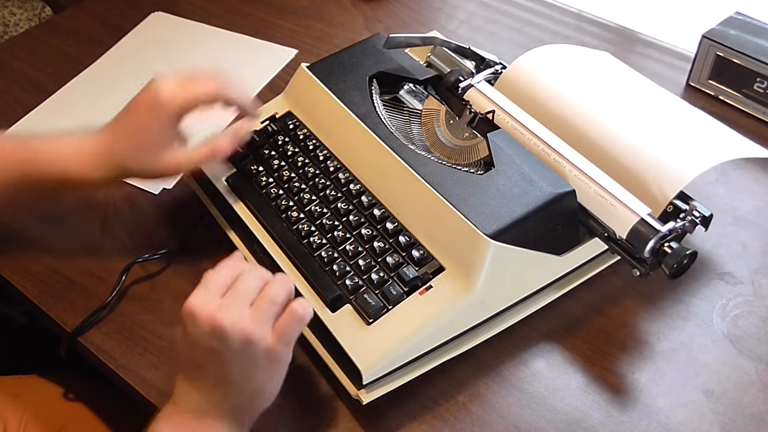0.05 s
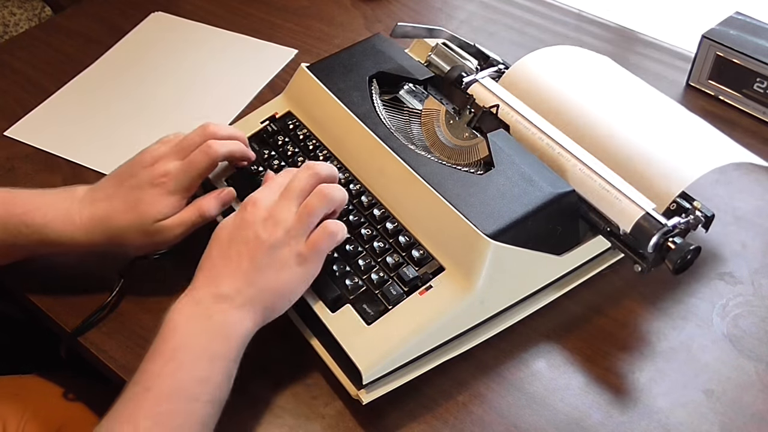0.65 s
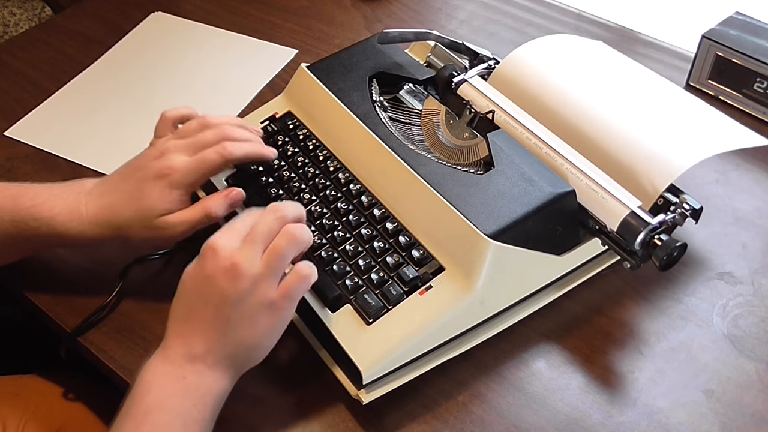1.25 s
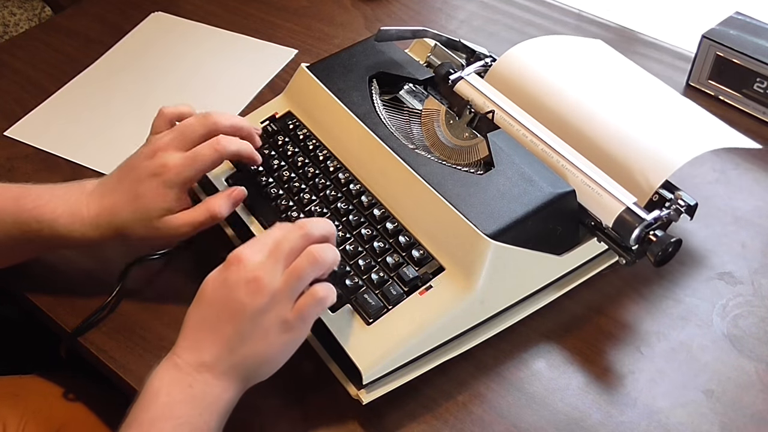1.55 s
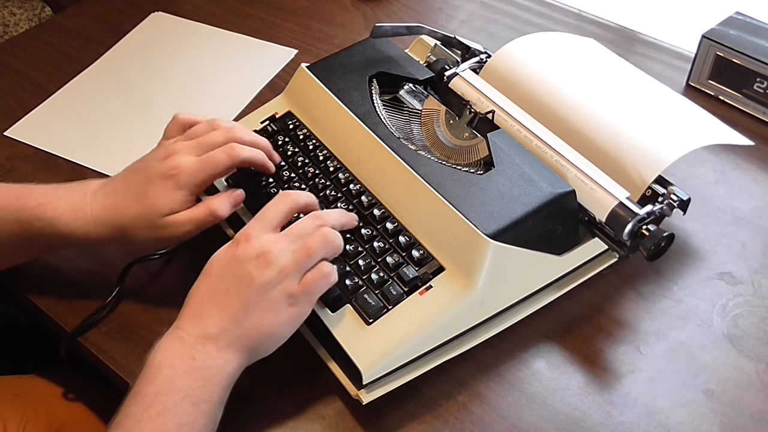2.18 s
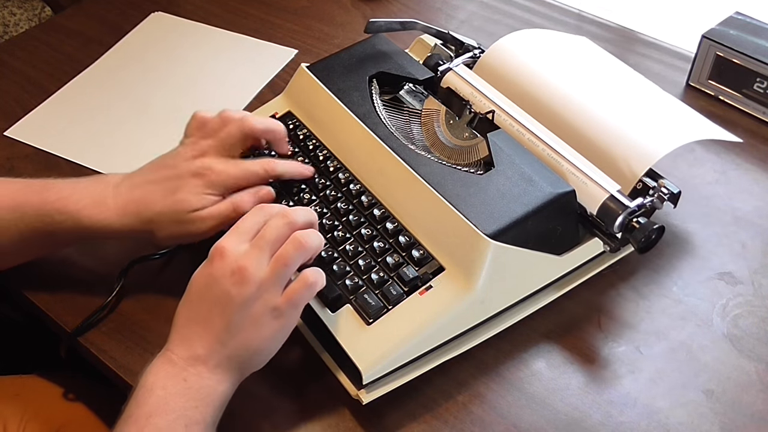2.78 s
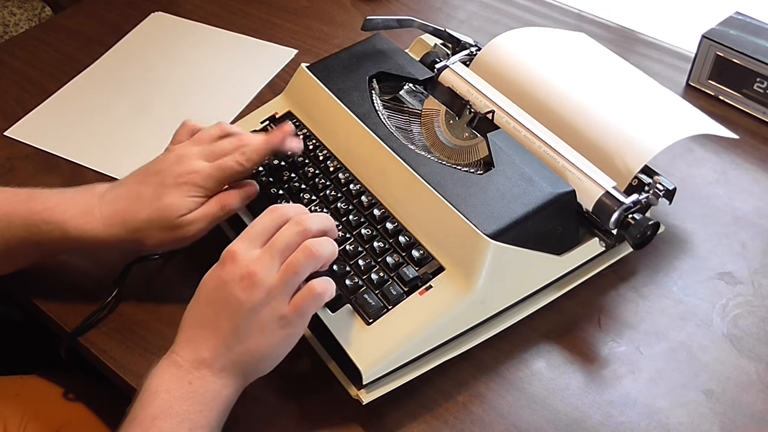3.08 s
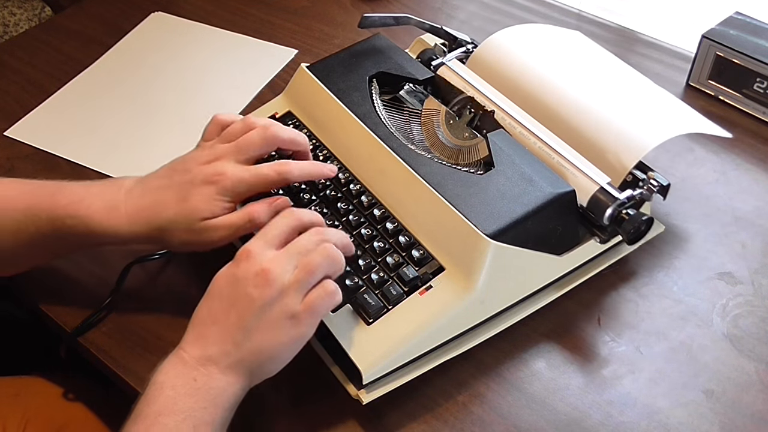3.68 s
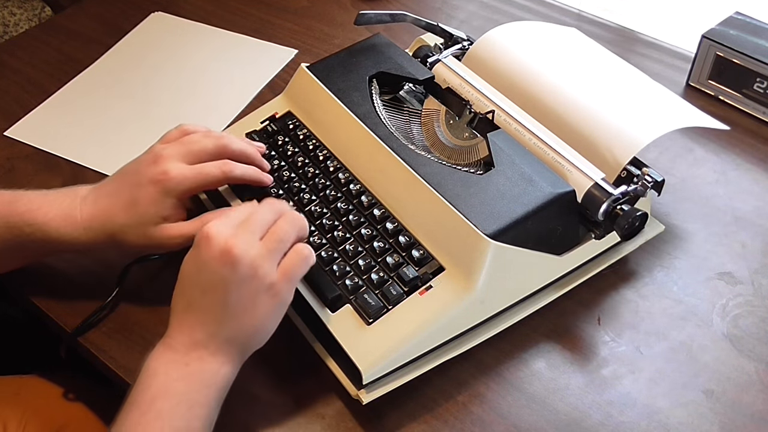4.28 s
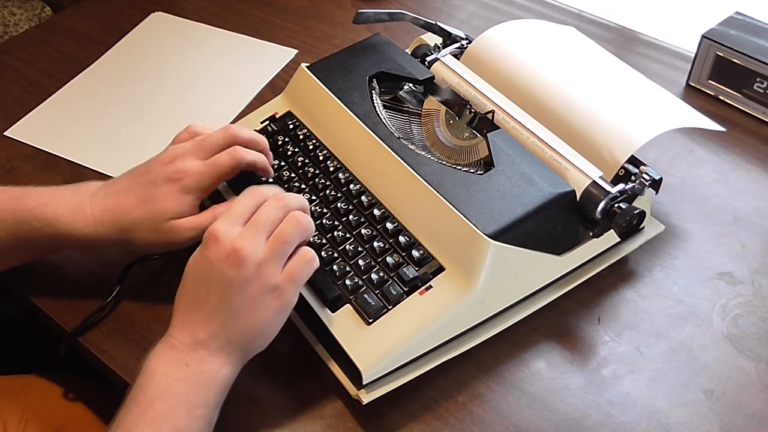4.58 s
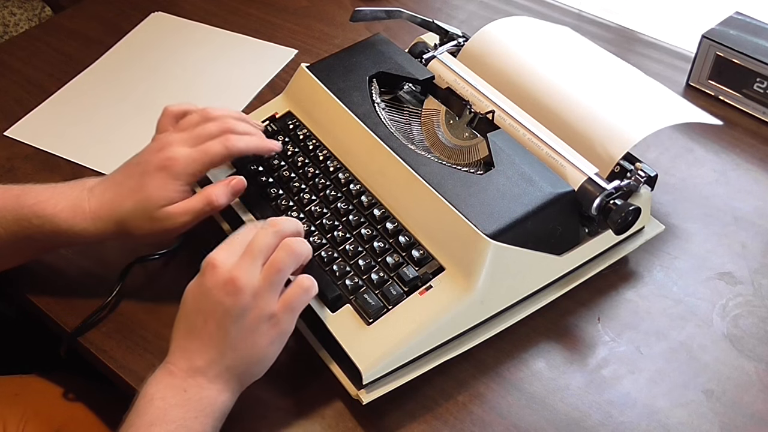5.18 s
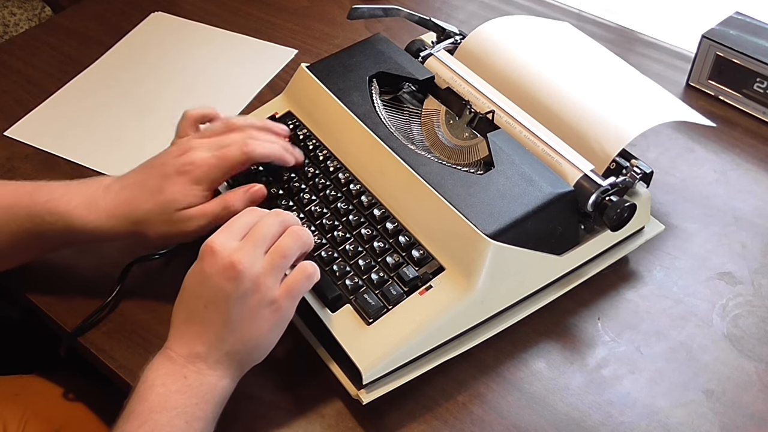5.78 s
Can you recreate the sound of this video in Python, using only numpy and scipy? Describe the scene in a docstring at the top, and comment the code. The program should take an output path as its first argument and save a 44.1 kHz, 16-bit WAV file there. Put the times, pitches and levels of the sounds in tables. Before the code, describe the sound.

An electric typewriter clacks in short, uneven runs of keystrokes, with a faint motor hum in the pauses.

```python
"""On a wooden desk an electric typewriter is typed on in quick runs, its motor idling in the pauses.
In each stroke a cam catches the power roll, a type bar swings up rattling, the escapement trips and
the slug slaps the platen; the type basket rings, the case thuds and the bar drops back onto its rest.
The shift clunks before the first letter, and the space bar goes down and up between words.
Each part is a resonator driven by impacts: the contacts set its rhythm, its damped modes its timbre."""
import sys
import numpy as np
from scipy import signal
from scipy.fft import rfft, irfft
from scipy.io import wavfile

SR = 44100
rng = np.random.default_rng(int(sys.argv[2]) if len(sys.argv) > 2 else 0)


def master(y):
    """Save y as 16-bit WAV."""
    cut = np.clip(np.atleast_2d(y).T, -1, 1)
    pcm = np.round(cut * 32767)  # scale
    wavfile.write(sys.argv[1], SR, pcm.astype(np.int16))


N = 257544
TIME = np.arange(N) / SR

# Loudness of the background hum and hiss, which sinks during the typing and recovers.
# Each row: time in seconds, level of hum and whirr in dB, level of hiss in dB.
BACKGROUND_LEVELS = [(0, -53, -60), (.55, -54, -65.5), (1.9, -60, -80), (3.45, -66.5, -78), (4.4, -61, -73),
                     (5.05, -62.5, -73), (5.84, -55, -67.5)]
# Hum lines of motor and belt. Each row: frequency in Hz, relative level in dB.
HUM_LINES = [(118.4, -70), (204.6, -69.5), (236.9, -69), (414.5, -76.5), (463, -79), (737.5, -73.5),
             (958, -80.5), (1265, -79), (1513, -87.5), (1787, -82)]
# Steady noises. Each row: frequency in Hz, relative spectral density in dB.
WHIRR_SPECTRUM = [(18, -48), (30, -19), (85, -9.5), (113, 0.5), (177, -8), (236, -7), (327, -10.5),
                  (463, -4.5), (572, -11.5), (707, -9), (1100, -15), (1650, -16), (3000, -36.5),
                  (3900, -68), (6600, -120)]
HISS_SPECTRUM = [(2000, 1), (3200, -6), (4900, 6), (6500, -2.5), (10000, -2), (16000, -6.5)]
FLAT_SPECTRUM = [(20, 0), (20000, 0)]
# Likeness of the two sides in noise and ringing. Each row: frequency in Hz, correlation from -1 to 1.
STEREO_CORRELATION = [(60, 0.31), (300, 0.74), (2500, 0.82), (5000, 0.74), (8000, 0.42), (10000, 0.15),
                      (11500, 0.39), (12500, 1), (16000, 0.54)]

# The dense ringing of each part. Each row: frequency in Hz, relative spectral density in dB.
CASE_SPECTRUM = [(30, -27.5), (55, -18), (100, -13), (170, -4), (240, -2.5), (330, -5.5), (450, 0.5),
                 (650, -4.5), (1000, -3), (1700, -3), (2200, -9), (2800, -22), (5000, -14), (16000, -57)]
KEY_STOP_SPECTRUM = [(40, -33.5), (110, -12.5), (220, -5), (330, -5.5), (450, 5.5), (620, -4.5), (900, 2.5),
                     (1250, -3), (1750, -4.5), (2700, -19.5), (5000, -24), (16000, -48.5)]  # a key or the space bar knocking hollowly on its stop
LEVER_SPECTRUM = [(60, -38.5), (400, -8), (1000, -12), (2700, -12.5), (3400, -11.5), (4300, 0.5),
                  (5200, -2), (6300, -3.5), (7500, -7.5), (10000, -8.5), (13000, -10.5), (16000, -14)]
BAR_SLOT_SPECTRUM = [(60, -34), (400, -10.5), (1000, -6.5), (2700, -14.5), (3600, -9), (4400, 0), (5500, 1),
                     (6500, -2), (7800, -10.5), (11000, -11.5), (16000, -17)]  # a type bar scraping up through its slot
ESCAPEMENT_SPECTRUM = [(60, -19.5), (400, -9), (1500, -11.5), (2800, -11.5), (4000, 0), (4800, -2),
                       (6000, -1.5), (10000, -4), (13500, -2.5), (16000, -10)]
BASKET_SPECTRUM = [(60, -34.5), (400, -16), (1000, -14), (2700, -14), (3400, -5), (4600, -1.5),
                   (7000, -1.5), (8700, -1), (9800, -4), (13000, -9.5), (16000, -18)]
# Ringing modes. Each row: frequency in Hz, relative level in dB, time to fall 60 dB in seconds.
CASE_FRAME_MODES = [(100, -8, 0.47), (202.5, -1.5, 0.49), (235.2, 3.5, 0.094), (305, -12.5, 0.062),
                    (452, 0.5, 0.43), (554.3, 2, 0.26), (728.7, 1, 0.25), (833, 2.5, .15),
                    (878.5, -1, 0.28), (1000, -5, 0.078), (1191, 4.5, .2), (1230, -3.5, 0.2),
                    (1260, -8, .18), (1496, 4.5, 0.15), (1780, -8.5, 0.2)]
BAR_SPRING_MODES = [(3950, -6.5, .17), (4530, -1, 0.17), (4850, -1.5, .2), (4930, -0.5, .2),
                    (5112, -5, .25), (5070, -2.5, .19), (6840, -5, .25), (6900, -4, .2), (7160, -1, 0.19),
                    (7470, -4, 0.22), (8050, -1, 0.28), (8530, -0.5, .2), (8869, -3.5, .18)]
# Heavily damped modes. Each row: frequency in Hz, relative level in dB, time to fall 60 dB in seconds,
# left-right difference in dB.
PAWL_PING_MODES = [(4780, -0.5, 0.029, 3), (5760, -0.5, 0.02, -0.5), (8870, -3.5, .025, -4.5),
                   (12200, 0.5, .025, 2)]
PLATEN_MODES = [(1900, -12.5, 0.0044, -4.5), (3130, -21.5, 0.046, 0.5), (3660, -15, 0.014, 2.5),
                (3880, -8.5, 0.015, -3.5), (4616, -2, 0.015, 2), (5090, 1, 0.0065, -2),
                (6200, 2, 0.0019, -1)]  # the slug on the platen
BRIGHT_EDGE_MODES = [(7600, -5.5, 0.002, -6), (8800, 6, 0.0036, -6.5), (9440, -0.5, 0.0036, -10.5),
                     (11650, 3.5, 0.00464, 1.5), (13200, -17, 0.0029, 8)]  # the treble of that blow

# Type strokes. Each row: time of the slap in seconds, force in dB above the usual, slap level in dB,
# its bright edge in relative dB, cam's lead in seconds, cam level in dB, thump level in dB.
TYPE_STROKES = [(0.7726, 3.5, 8.5, 20, .055, -19, -32), (0.993, 4, 6, 10, 0.049, -35.5, -37),
                (1.134, 2.5, 4, -2.5, 0.054, -37.5, -41), (1.2745, 0.5, 6.5, -2, 0.045, -33, -35),
                (1.6146, 3, 5, -4, .067, -36, -32.5), (1.7573, 0, 7.5, -3, 0.051, -35, -36),
                (1.9793, -.5, 9, -8.5, .052, -39, -41), (2.1582, -1, 7.5, -4.5, 0.061, -35.5, -68.5),
                (2.3003, -1.5, 3.5, -8, 0.047, -38.5, -65), (2.439, -3.5, 6.5, -6, 0.032, -38, -53.5),
                (2.5784, -4.5, 7, -0.5, 0.058, -39, -60), (2.9162, -2.5, 6.5, -1.5, 0.04, -35.5, -66),
                (3.1367, -2, 7, -1, 0.036, -38.5, -46), (3.2006, -4.5, 4.5, -1, 0.037, -45, -61),
                (3.6216, 0.5, 6.5, -2, .061, -38.5, -61.5), (3.7617, -.5, 5.5, -5, 0.032, -36, -51),
                (3.8986, -.5, 6, -.5, .045, -34.5, -51), (4.5517, 4, 9, -2.5, 0.047, -28.5, -34),
                (4.697, 0, 7, -0.5, .049, -44, -50), (5.196, 4, 9.7, -6, 0.053, -30, -34),
                (5.7319, 5, 8.5, -8, 0.049, -32, -33.5)]
# The space bar. Each row: press time in seconds, release time in seconds, force in dB above the usual.
SPACE_PRESSES = [(1.383, 1.469, 3), (2.669, 2.761, -6), (4.02, 4.124, -2), (5.309, 5.409, 1.5)]
# Keys touched without printing. Each row: time in seconds, click level in dB, knock level in dB.
IDLE_TOUCHES = [(.097, -74, -53), (0.481, -51, -63), (.896, -34.5, -36), (3.06, -44, -54.5),
                (4.819, -68, -60)]
# Contacts within one movement. Each row: delay in seconds, steel click and hollow knock in relative dB.
SHIFT_CONTACTS = [(0, -26.5, -22), (.018, -24, -25), (.05, -50, -27.5), (.116, -57, -42.5)]
SPACE_DOWN_CONTACTS = [(0, -40, -36), (.028, -59, -43.5)]
SPACE_UP_CONTACTS = [(-.016, -47.5, -58), (0, -43.5, -40), (.016, -45.5, -35), (.055, -62, -41.5)]
CAM_CATCH_CONTACTS = [(0, -2.5, -17.5), (.007, -2.5, -13.5)]  # the cam catches and its pawl bounces
CAM_KICK_CONTACTS = [(-.025, -8, -6)]  # the cam kicks the bar
BAR_REST_CONTACTS = [(.086, -59.5, -45)]  # the bar lands on its rest


def from_db(db):
    """Amplitude grows tenfold with every 20 dB."""
    return 10 ** (np.asarray(db) / 20)


def unit_energy(x):
    """Normalisation to a mean energy of 1 per channel."""
    return x / np.sqrt(np.sum(x ** 2) / len(np.atleast_2d(x)) + 1e-20)


def at_hz(points, hz):
    """Interpolation along a logarithmic frequency axis."""
    known_hz, values = np.transpose(points)
    return np.interp(np.log(hz), np.log(known_hz), values)


def add(out, s, sound):
    """Superposition: a sound joins the mix at s seconds."""
    start = max(round(s * SR), 0)
    part = sound[..., :max(N - start, 0)]
    out[..., start:start + part.shape[-1]] += part


def waver(rate_hz):
    """Random modulation: a line through normally distributed values."""
    return np.interp(TIME * rate_hz, np.arange(N // 100), rng.standard_normal(N // 100))


def noise(spectrum, size):
    """Random phases give coloured noise; the ratio of mid to side sets its stereo correlation."""
    hz = np.maximum(np.fft.rfftfreq(size, 1 / SR), 1)
    alike = np.clip(at_hz(STEREO_CORRELATION, hz), -1, 1)
    mid, side = np.exp(2j * np.pi * rng.random((2, len(hz))))
    channels = np.sqrt(1 + alike) * mid + np.sqrt(1 - alike) * side * [[1], [-1]]
    return unit_energy(irfft(channels * from_db(at_hz(spectrum, hz)), size))


def high_pass(x, hz):
    """High-pass filter: the sound is kept free of deep bass below hz."""
    return signal.sosfilt(signal.butter(2, hz, "high", fs=SR, output="sos"), x)


def colour(x, spectrum, size=4096):
    """A minimum-phase filter shapes the spectrum causally; white noise keeps its power."""
    hz = np.maximum(np.fft.rfftfreq(size, 1 / SR), 1)
    cepstrum = irfft(np.log(from_db(at_hz(spectrum, hz))))
    cepstrum[1:size // 2] *= 2
    cepstrum[size // 2 + 1:] = 0
    response = unit_energy(irfft(np.exp(rfft(cepstrum))))
    return signal.oaconvolve(x, response[None], axes=1)[:, :N]


def rattle(times, levels_db, fall_s, rise_s, per_s, spread_db):
    """Loose parts collide at random: bursts of uneven impulses swell, then lose 20 dB every fall_s."""
    out, t = np.zeros(N), TIME[:SR // 8]
    envelope = np.minimum((t + 1 / SR) / rise_s, 1) * from_db(-20 * np.maximum(t - rise_s, 0) / fall_s)
    for s, db in zip(times, levels_db):
        touching = (rng.random(len(t)) < per_s / SR) | (t == 0)
        sizes = from_db(spread_db * rng.uniform(-1, 1, len(t))) * rng.choice([-1, 1], len(t))
        add(out, s, from_db(db) * np.sqrt(SR // 100) * unit_energy(touching * sizes * envelope))
    return out


def excite(contacts, response):
    """Convolution: every contact starts the impulse response anew."""
    return signal.oaconvolve(contacts[None], response, axes=1)[:, :N]


def modal_ring(modes, width_rad):
    """Free vibration is a sum of decaying sines; each reaches the two sides at different phases."""
    hz, db, t60 = np.transpose(modes)[:, :, None]
    t = TIME[:SR // 2]
    apart = width_rad * rng.uniform(0.28, 1, hz.shape) * (-1) ** np.arange(len(hz))[:, None]
    decays = from_db(db - 60 * t / t60) * rng.choice([-1, 1], hz.shape)
    channels = [(decays * np.sin(2 * np.pi * hz * t + side * apart / 2)).sum(0) for side in (1, -1)]
    return unit_energy(np.array(channels))


def damped_blow(modes, detune):
    """An impact excites heavily damped modes, whose tuning and strength vary from blow to blow."""
    hz, db, t60, pan_db = np.transpose(modes)[:, :, None]
    t = TIME[:SR // 30]
    hz = hz * (1 + detune * rng.standard_normal(hz.shape))
    db = db + rng.normal(0, 1.8, db.shape)
    polarity = (-1) ** np.arange(len(hz))[:, None]
    rings = polarity * from_db(db - 60 * t / t60) * np.sin(2 * np.pi * hz * t)
    return unit_energy(np.array([(rings * from_db(side * pan_db / 2)).sum(0) for side in (1, -1)]))


def stored_energy(contacts, t60):
    """Damping: the energy that contacts put into a part leaks away exponentially."""
    retained = from_db(-120 / (t60 * SR))
    return signal.lfilter([1 - retained], [1, -retained], contacts ** 2 + 1e-18)


def resonate(contacts, spectrum, crack_t60, tail_t60, tail_db, direct_db, modal_share=0.22):
    """Two-stage decay: loose pieces chatter in a short crack, then in a tail shared with close modes."""
    tail, direct = from_db(tail_db), from_db(direct_db)
    tail_energy = (1 - modal_share) * tail ** 2 * stored_energy(contacts, tail_t60)
    energy = stored_energy(contacts, crack_t60) + tail_energy
    chatter = np.sqrt(N * energy) * noise(FLAT_SPECTRUM, size=N)
    t = TIME[:SR // 2]
    close_modes = unit_energy(noise(FLAT_SPECTRUM, size=len(t)) * from_db(-60 * t / tail_t60))
    ringing = chatter + np.sqrt(modal_share) * tail * excite(contacts, close_modes)
    return colour((direct * contacts + ringing) / np.sqrt(1 + tail ** 2 + direct ** 2), spectrum)


def motor():
    """Rotation gives line spectra, a hum and a thin whine, over hiss and the whirr of belt and roll."""
    s, *levels = np.transpose(BACKGROUND_LEVELS)
    hum_db, hiss_db = [np.interp(TIME, s, level) for level in levels]
    hum = np.zeros(N)
    for hz, db in HUM_LINES:
        amplitude = from_db(db + 2.1 * waver(rate_hz=7.9))
        hum += amplitude * np.sin(2 * np.pi * hz * TIME + 0.2 * waver(rate_hz=12))
    whirr = noise(WHIRR_SPECTRUM, size=N) * from_db(1.1 * waver(rate_hz=38))
    running = from_db(-4) * unit_energy(hum) + from_db(-2.5) * whirr
    whine_hz, whine_peak = 3063, np.sqrt(2) * from_db(-89.5)
    whine = whine_peak * np.sin(2 * np.pi * whine_hz * TIME + 0.3 * waver(rate_hz=12))
    hiss = from_db(hiss_db) * noise(HISS_SPECTRUM, size=N)
    return whine + np.sqrt(N) * (from_db(hum_db) * running + hiss)


def movements(times, levels_db, pattern):
    """A mechanism repeats the same run of contacts each time it moves."""
    return [(s + delay, db + click, db + knock)
            for s, db in zip(times, levels_db) for delay, click, knock in pattern]


def key_action(times, force_db, lead_s, cam_db):
    """Each catch or stop is an impact; returns their times, click levels and knock levels."""
    down_s, up_s, space_db = np.transpose(SPACE_PRESSES)
    cams = movements(times - lead_s, cam_db, CAM_CATCH_CONTACTS)
    kicks = movements(times, cam_db, CAM_KICK_CONTACTS)
    landings = movements(times, force_db, BAR_REST_CONTACTS)
    presses = movements(down_s, space_db, SPACE_DOWN_CONTACTS)
    releases = movements(up_s, space_db, SPACE_UP_CONTACTS)
    shift = movements(times=[0.56], levels_db=[0], pattern=SHIFT_CONTACTS)
    return np.transpose(cams + kicks + landings + presses + releases + shift + IDLE_TOUCHES)


def low_pops(times, levels_db, rise_s, back_s):
    """A bipolar pulse: a short low pop at each stroke, with a quick rise and a slower swing back."""
    out, t = np.zeros(N), TIME[:SR // 30]
    rise, swing_back = [t / tau ** 2 * np.exp(-t / tau) for tau in (rise_s, back_s)]
    for s, db in zip(times, levels_db):
        add(out, s, from_db(db) * np.sqrt(SR // 100) * unit_energy(rise - swing_back))
    return out


def case(times, force_db, knock_s, knock_db):
    """Structure-borne sound: the bar's lift, blow and fall shake the case, and keys knock on it."""
    knocks = rattle(knock_s, knock_db, fall_s=0.014, rise_s=0.0026, per_s=1000, spread_db=4)
    lift = rattle(times - 0.029, force_db - 33.5, fall_s=0.04, rise_s=0.009, per_s=1400, spread_db=3.5)
    thud = rattle(times - 0.006, 0.83 * force_db - 31.5,
                  fall_s=0.019, rise_s=0.0027, per_s=3000, spread_db=7)
    fall = rattle(times + 0.033, 0.49 * force_db - 37,
                  fall_s=0.041, rise_s=0.014, per_s=580, spread_db=14)
    contacts = lift + thud + fall
    clatter = resonate(contacts, CASE_SPECTRUM, crack_t60=0.025, tail_t60=0.26, tail_db=-2, direct_db=-3)
    keys = resonate(knocks, KEY_STOP_SPECTRUM,
                    crack_t60=0.067, tail_t60=0.19, tail_db=4.5, direct_db=-1.5, modal_share=0.45)
    ring = excite(contacts + from_db(-0.5) * knocks, modal_ring(CASE_FRAME_MODES, width_rad=0.58))
    return clatter + keys + from_db(-5.5) * high_pass(ring, hz=80)


def linkage(times, force_db, click_s, click_db):
    """Impact and friction: cams and levers click, and the driven bar scrapes up through its slot."""
    catches = rattle(click_s, click_db, fall_s=0.009, rise_s=0.0028, per_s=4000, spread_db=7.5)
    swings = rattle(times - 0.038, 1.5 * force_db - 29,
                    fall_s=0.029, rise_s=0.013, per_s=1100, spread_db=8.5)
    clicks = resonate(catches, LEVER_SPECTRUM, crack_t60=0.025, tail_t60=0.19, tail_db=8, direct_db=4.5)
    scrapes = resonate(swings, BAR_SLOT_SPECTRUM,
                       crack_t60=0.033, tail_t60=0.2, tail_db=6.5, direct_db=4.5)
    return clicks + scrapes


def pawls(click_s, click_db):
    """Small parts have high natural frequencies: each pawl pings briefly at its own pitch."""
    out = np.zeros((2, N))
    for s, db in zip(click_s, click_db):
        add(out, s, from_db(db + 19) * damped_blow(PAWL_PING_MODES, detune=0.079))
    return out


def escapement(times, force_db):
    """A sharp transient: the carriage dog is tripped just before the slug lands."""
    trips = rattle(times - 0.007, 1.5 * force_db - 24.5,
                   fall_s=0.019, rise_s=0.0029, per_s=7900, spread_db=9.5)
    return resonate(trips, ESCAPEMENT_SPECTRUM,
                    crack_t60=0.0036, tail_t60=0.12, tail_db=-14.5, direct_db=-3.5)


def type_basket(times, force_db):
    """Shock excitation: the blow shakes all the bars and springs, which buzz and ring out."""
    shakes = rattle(times, 0.45 * force_db - 22, fall_s=0.007, rise_s=0.00058, per_s=6300, spread_db=8.5)
    bounces = rattle(times + 0.006, 0.41 * force_db - 31.5,
                     fall_s=0.061, rise_s=0.0023, per_s=800, spread_db=14)
    ring = resonate(shakes, BASKET_SPECTRUM, crack_t60=0.02, tail_t60=0.26, tail_db=2.5, direct_db=-8)
    tones = from_db(-8.5) * excite(shakes, modal_ring(BAR_SPRING_MODES, width_rad=0.79))
    buzz = resonate(bounces, BASKET_SPECTRUM, crack_t60=0.0082, tail_t60=0.2, tail_db=-1, direct_db=-1.5)
    return ring + tones + buzz


def type_slugs(times, slap_db, edge_db):
    """A brief impact has a broad spectrum: the slug hits paper and platen, the peak of each stroke."""
    out = np.zeros((2, N))
    for s, db, bright_db in zip(times, slap_db, edge_db):
        slap = damped_blow(PLATEN_MODES, detune=0.017)
        edge = from_db(bright_db) * damped_blow(BRIGHT_EDGE_MODES, detune=0.044)
        add(out, s, from_db(db) * unit_energy(slap + edge))
    return high_pass(out, hz=700)


def scene():
    """Superposition of all parts of the machine, heard from just above it."""
    times, force_db, slap_db, edge_db, lead_s, cam_db, thump_db = np.transpose(TYPE_STROKES)
    key_s, click_db, knock_db = key_action(times, force_db, lead_s, cam_db)
    levers = linkage(times, force_db, key_s, click_db) + pawls(key_s, click_db)
    steel = levers + escapement(times, force_db) + type_basket(times, force_db)
    blows = type_slugs(times, slap_db, edge_db)
    body = case(times, force_db, key_s, knock_db)
    thumps = low_pops(times, thump_db, rise_s=0.0005, back_s=0.00091)
    pops = low_pops(times, 1.3 * force_db - 32, rise_s=0.000085, back_s=0.0014)
    wide_pops = pops * np.array([[1], [-1]])  # opposite polarity on the two sides sounds wide
    balance = from_db([[-0.3], [0.3]])
    return (motor() + thumps + wide_pops + body + steel + blows) * balance


def record(dry):
    """Soft saturation rounds the highest peaks, and a steep low-pass cuts the top treble."""
    ceiling, cutoff_hz = 0.66, 15850
    low_pass = signal.ellip(10, 0.1, 80, cutoff_hz, fs=SR, output="sos")
    return signal.sosfilt(low_pass, ceiling * np.tanh(dry / ceiling))


dry = scene()
out = record(dry)
master(out)
```